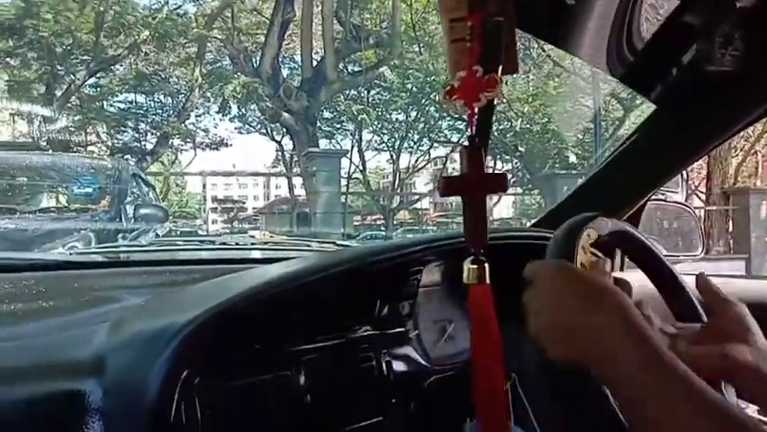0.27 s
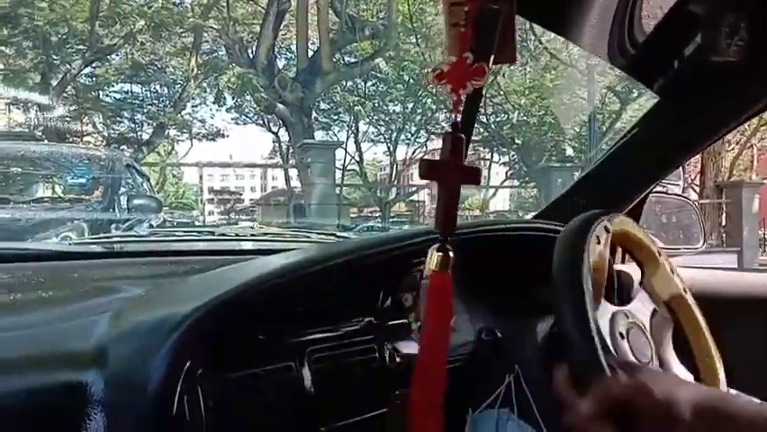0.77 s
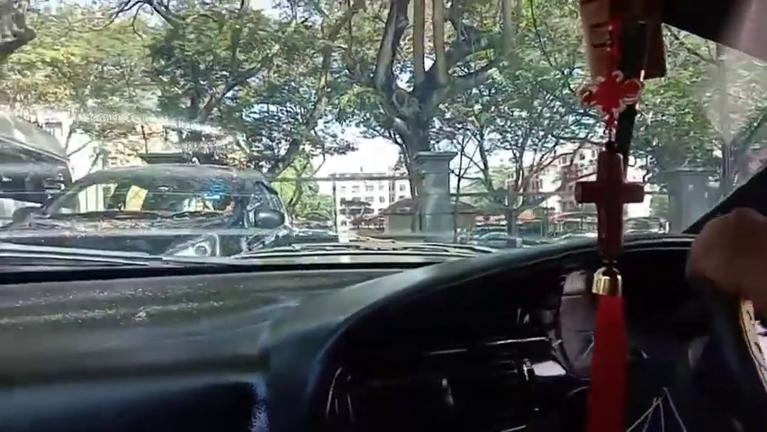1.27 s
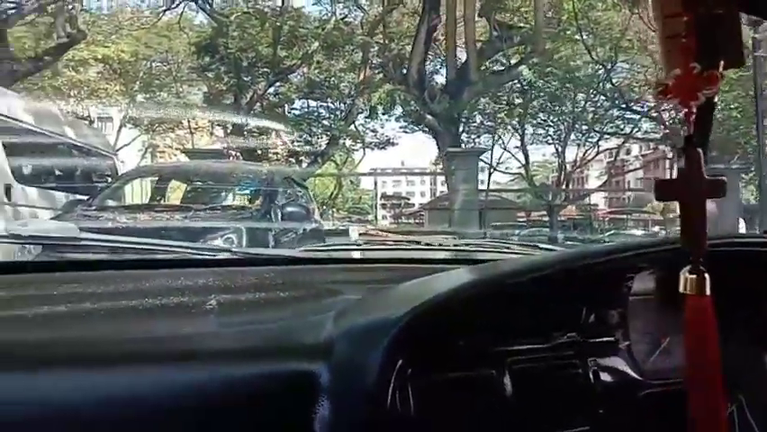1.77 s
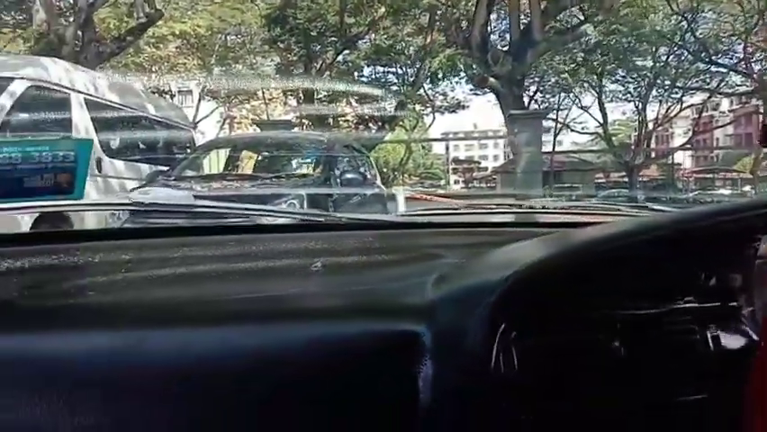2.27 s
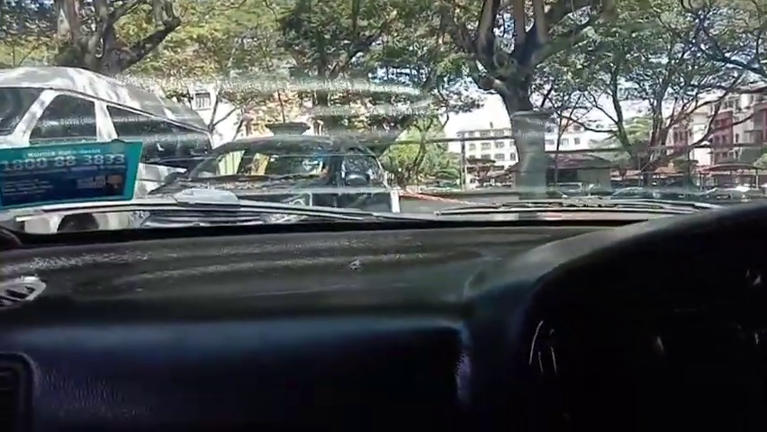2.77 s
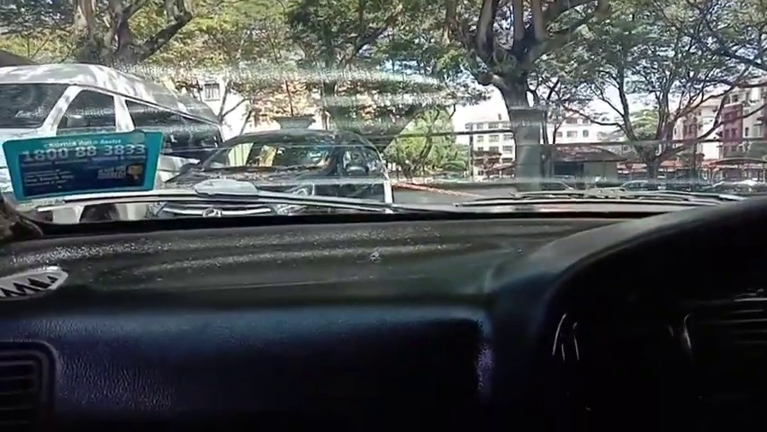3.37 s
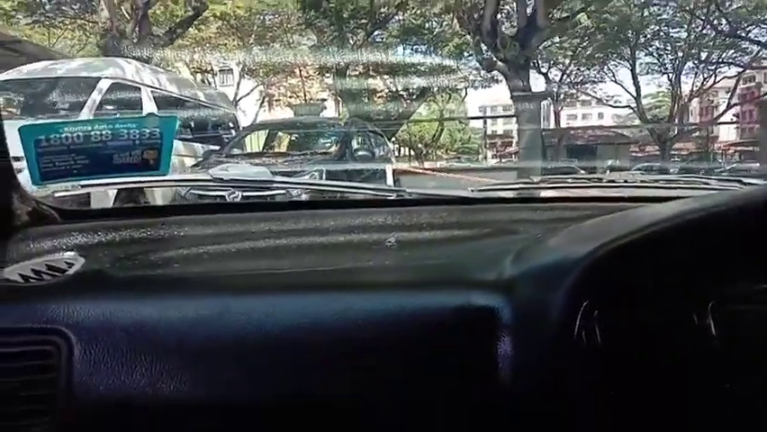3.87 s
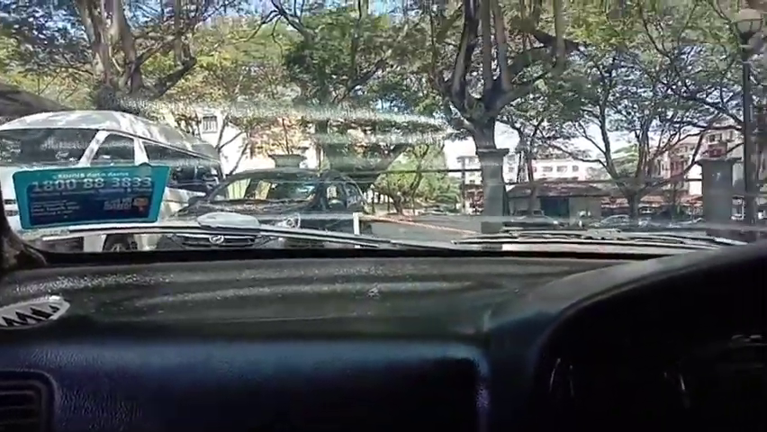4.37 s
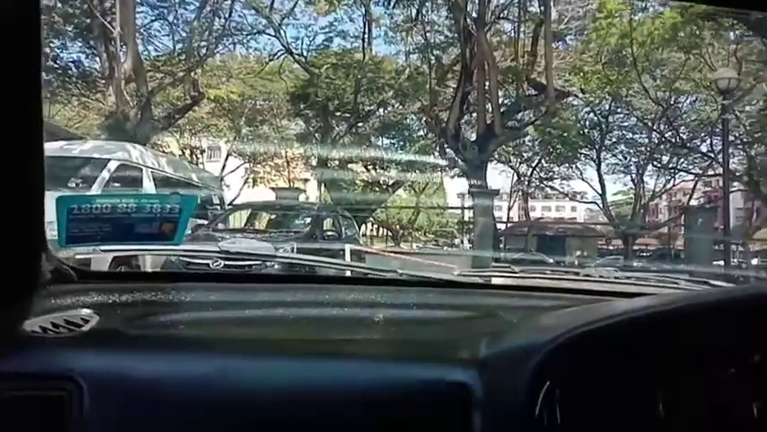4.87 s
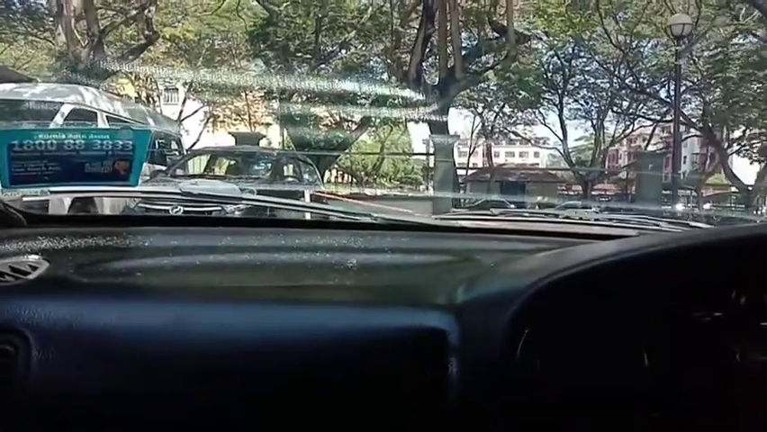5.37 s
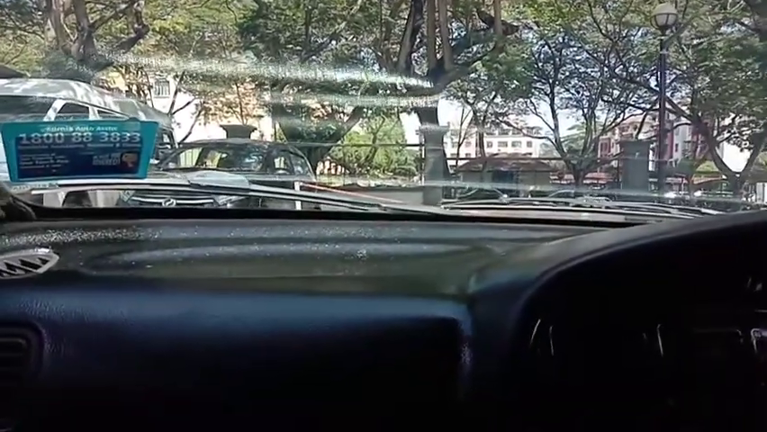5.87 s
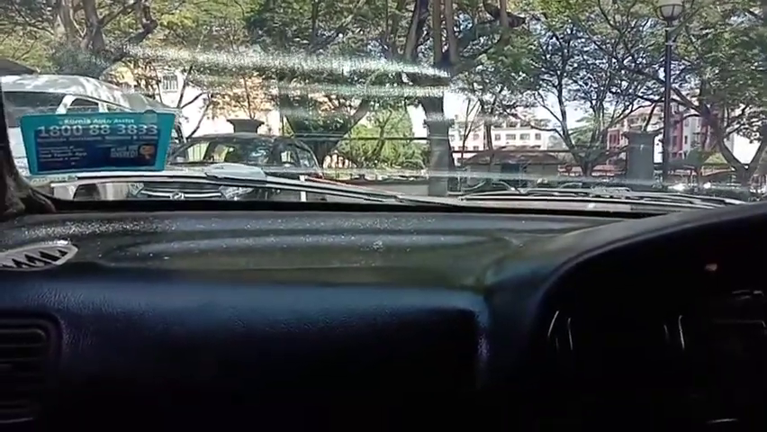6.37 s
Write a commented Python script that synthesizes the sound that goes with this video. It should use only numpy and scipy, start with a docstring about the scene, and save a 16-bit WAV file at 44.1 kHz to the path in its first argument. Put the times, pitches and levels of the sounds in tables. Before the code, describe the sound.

Inside a small car with the windows shut, a microphone by the passenger seat picks up a deep, throbbing engine idle, dull body rumble and soft air hiss. At 0.4 to 0.8 s the steering rim rubs through a palm with faint stuttering squeaks, and an ornament ticks. The engine rises from about 0.7 s, peaks near 1.2 s, then eases until 2.1 s. A second short dab lifts it at 2.2 s, while a loose dashboard panel rattles rapidly until 2.6 s with a low shudder. It sags, then pulls again from 3.2 to 4 s; the panel chatters at 3.9 to 4.1 s and trim creaks. A shudder follows near 4.3 s and 4.5 s as clothing brushes the seat. The engine slowly settles to a low idle until 6.6 s, with light rustles, creaks, hollow pedal bumps near 5.7 and 6.2 s, and very faint bird whistles.

```python
"""A four-cylinder car creeps into a parking space, heard from the passenger seat with the windows shut.
Its engine is a stack of harmonics that follows a speed curve: three dabs of throttle, then idling.
Filtered noise makes the body's rumble and the steady air noise; a loose dashboard panel rings at each slap.
The steering wheel squeaks through a hand by stick and slip, an ornament clicks, and trim creaks.
Clothes brush the seat, feet bump the pedals, and gliding tones make faint birds outside."""
import sys
import numpy as np
from scipy import signal
from scipy.fft import rfft, irfft
from scipy.io import wavfile

SR = 44100
rng = np.random.default_rng(int(sys.argv[2]) if len(sys.argv) > 2 else 0)


def log_audio(samples):
    """Write samples as a 16-bit WAV file to the path given in sys.argv[1]."""
    # one column per channel
    frames = np.atleast_2d(samples).T
    # limit to full scale, then quantise
    limited = np.clip(frames, -1, 1)
    pcm = np.round(limited * 32767).astype(np.int16)
    wavfile.write(sys.argv[1], SR, pcm)


N = 292383
T = np.arange(N) / SR  # time of each sample, s


def undb(db):
    """Decibels to gain."""
    return 10 ** (np.asarray(db) / 20)


def unit(x):
    """Scale to an average strength (rms) of 1."""
    return x / np.sqrt(np.mean(x ** 2))


def curve(rows):
    """Join a table of (time [s], value) by straight lines."""
    return np.interp(T, *np.transpose(rows))


def walk(rate):
    """Smooth chance of spread 1 that changes about `rate` times a second."""
    f = np.arange(N // 2 + 1) * SR / N
    return unit(irfft(rfft(rng.standard_normal(N)) * np.exp(-(f / rate) ** 2), N))


def colour(x, points):
    """Filter by an outline of (frequency [Hz], level [dB]) that falls away steeply beyond its ends."""
    f = np.maximum(np.arange(N // 2 + 1) * SR / N, 1)
    hz, db = np.transpose(points)
    low_end = 1 / (1 + (hz[0] / f / 1.3) ** 6)
    high_end = 1 / (1 + (f / hz[-1] / 1.3) ** 6)
    outline = undb(np.interp(np.log(f), np.log(hz), db))
    return irfft(rfft(x) * outline * (low_end * high_end), N)


def ring(x, modes, order=1):
    """Add up resonances (Hz, width Hz, dB); at order 2 each acts twice, which darkens the valleys."""
    out = 0
    for hz, width, db in modes:
        peak = np.concatenate(signal.iirpeak(min(hz, .45 * SR), hz / width, fs=SR))
        out = out + undb(db) * signal.sosfilt([peak] * order, x)
    return out


def strike(start, t60, attack):
    """Envelope of a blow: quick rise, then a fall by 60 dB in t60 seconds."""
    age = np.maximum(T - start, 0)
    return (1 - np.exp(-age / attack)) * np.exp(-np.log(1000) * np.minimum(age / t60, 4))


def swell(start, end, attack, release):
    """Envelope from 0 to 1: rises from the start, holds, and falls after the end."""
    return np.clip(np.minimum((T - start) / attack, 1 - (T - end) / release), 0, 1)


def birds():
    """Thin gliding whistles, broken up by their many paths through the trees."""
    # bird notes: (start [s], length [s], start pitch [Hz], end pitch [Hz], relative level [dB])
    notes = [(0.224, 0.19, 3010, 3140, -53.5), (4.69, 0.1, 2850, 3126, -52), (5.162, 0.1, 2160, 2240, -50),
             (5.544, 0.11, 2688, 2510, -50), (6.029, 0.076, 3340, 2780, -59),
             (6.105, 0.072, 2580, 2560, -50), (6.425, 0.047, 3234, 3325, -55)]
    out = 0
    for start, length, from_hz, to_hz, db in notes:
        part = np.clip((T - start) / length, 0, 1)
        hz = from_hz + (to_hz - from_hz) * part
        out = out + undb(db) * np.sin(np.pi * part) * np.exp(2j * np.pi * np.cumsum(hz) / SR)
    paths = 1 + walk(70) + 1j * walk(70)
    return np.real(out * paths) / 2


def air(phase, revs):
    """Air hiss with a faint pulse and a narrow wavering band; both are softer while the engine revs high."""
    # colour of the air noise: (frequency [Hz], level [dB])
    hiss_colour = [(500, 11), (660, 1.5), (1030, -4.5), (1270, 7.5), (1530, -1.5), (2700, -8.5),
                   (3800, -14), (5300, -15), (10000, -21.5), (13000, -26.5), (15500, -20.5)]
    middle_db, treble_db, band_db = -56, -57, -59
    softer_db = -2.5 * revs
    # the hiss pulses once per firing
    noise = unit(colour(rng.standard_normal(N) * (1 + 0.13 * np.cos(phase)), hiss_colour))
    soft = signal.sosfiltfilt(signal.butter(2, 3500, fs=SR, output="sos"), noise)
    # a narrow, slowly wavering band of noise: 1240 Hz, 170 Hz wide
    band = unit(ring(rng.standard_normal(N), [(1240, 170, 0)], order=2) * undb(2 * walk(3.3)))
    # the middle wavers more than the treble
    middle = (soft * undb(middle_db) + band * undb(band_db)) * undb(softer_db + 2.2 * walk(20))
    treble = (noise - soft) * undb(treble_db + .5 * softer_db + walk(25))
    return middle + treble


def rustle():
    """Fibres hiss and folds crackle in clumps as cloth brushes the seat, each stroke with its own band."""
    # strokes: (peak [s], rise [s], fall [s], level [dB], centre of the scrape [Hz])
    strokes = [(0.595, 0.03, 0.02, -50.5, 10900), (4.41, 0.17, 0.13, -44, 2820),
               (4.5, 0.2, 0.33, -48.5, 5700), (4.641, 0.041, 0.03, -44.5, 9920),
               (5.16, 0.042, 0.049, -50, 10000), (5.284, 0.032, 0.053, -45, 3780),
               (5.33, 0.039, 0.22, -51.5, 10000), (5.72, 0.12, 0.3, -58.5, 3220)]
    # colour of the cloth: (frequency [Hz], level [dB])
    cloth = [(450, 5), (950, -9.5), (1250, 8), (1600, -13.5), (2400, -5), (4300, -7), (5200, -5),
             (6400, -11), (10500, -8.5), (13000, -23), (15500, -17)]
    # about 1200 tiny snaps a second, in clumps
    snaps = unit(rng.standard_normal(N) * (rng.random(N) < 1200 / SR) * undb(4 * walk(40)))
    hiss = rng.standard_normal(N) * undb(2.5 * walk(400) + 2.2 * walk(45))
    fibres = unit(colour(hiss + .5 * snaps, cloth))
    # folds buckle around 1770 Hz, 4000 Hz wide
    folds = undb(-8.5) * unit(ring(snaps, [(1770, 4000, 0)], order=2))
    out = 0
    for peak, rise, fall, db, hz in strokes:
        scrape = ring(fibres, [(hz, 0.98 * hz, -2)], order=2) * undb(2 * walk(35))
        out = out + undb(db) * unit(fibres + folds + scrape) * swell(peak - rise, peak, rise, fall)
    return out


def clicks():
    """Ornament and keys touch: a tick and a faint longer gritty ring around each one's own pitch."""
    # clicks: (time [s], relative level [dB], rough centre [Hz])
    touches = [(0.488, -34.5, 7000), (2.756, -40.5, 8300), (2.776, -46, 4898), (2.853, -36, 5055),
               (2.861, -35, 6300), (3.886, -41.5, 7303), (4.144, -41, 7773), (4.27, -46, 4900),
               (5.138, -36, 3970)]
    out = 0
    for start, db, hz in touches:
        grit = unit(ring(rng.standard_normal(N), [(hz, 1.14 * hz, 0)], order=2))
        tick = strike(start, t60=0.029, attack=0.0031)
        tail = undb(-25.0) * strike(start, t60=0.36, attack=0.0028)
        out = out + undb(db) * grit * (tick + tail)
    return out * undb(3.5 * walk(300))


def creaks():
    """Plastic trim panels slip in short spurts of noise, each around its own pitch."""
    # creaks: (time [s], relative level [dB], pitch [Hz])
    spurts = [(0.607, -38.5, 1280), (2.758, -39, 1250), (2.857, -38, 1300), (3.884, -41, 1830),
              (4.146, -31, 1400), (4.477, -42, 2580), (4.532, -40, 2306), (4.674, -41.5, 1920),
              (4.746, -37, 2410), (4.85, -43, 2270), (5.087, -44, 1307), (5.322, -39, 1450),
              (5.657, -47, 1960), (5.711, -44, 3060), (6.22, -45, 2500)]
    # colour of the trim: (frequency [Hz], level [dB])
    trim = [(800, -12), (1300, 17.5), (1700, 7), (2600, 10), (3600, -10), (12000, -18)]
    skin = unit(colour(rng.standard_normal(N), trim))
    out = 0
    for start, db, hz in spurts:
        pitched = undb(-7) * unit(ring(skin, [(hz, 900, 0)], order=2))
        out = out + undb(db) * unit(skin + pitched) * strike(start, t60=0.086, attack=0.00245)
    return out * undb(2.5 * walk(300))


def bumps():
    """A shoe lands and scuffs on the pedals; three resonances of the footwell make it hollow."""
    # soft bumps: (time [s], relative level [dB])
    steps = [(0.09, -50), (3.123, -51), (4.5, -44.5), (5.656, -40.5), (6.222, -46), (6.358, -50)]
    scuff = rng.standard_normal(N) * undb(2.7 * walk(50))
    hollow = unit(ring(scuff, [(520, 160, 5), (752, 230, 1.5), (1210, 500, -1)], order=2))
    return hollow * sum(undb(db) * strike(start, t60=0.43, attack=0.0011) for start, db in steps)


def reflections(x, t60, wet_db):
    """Windscreen and side glass return a dense, short echo that leaves a fine fixed ripple on the sound."""
    tail = rng.standard_normal(N) * strike(0, t60, attack=0.00027)
    wet = signal.fftconvolve(x, tail / np.linalg.norm(tail))[:N]
    return (x + undb(wet_db) * wet) / np.sqrt(1 + undb(2 * wet_db))


def wheel(slip_hz):
    """The rim sticks and slips through the palm at an uneven rate, ringing the wheel; each slide squeaks."""
    # slides through the palm: (start [s], end [s], relative level [dB], squeak [Hz])
    slides = [(0.369, 0.459, -46, 6610), (0.501, 0.595, -48.5, 2690), (0.62, 0.78, -59.5, 5380)]
    # the steering wheel's resonances: (frequency [Hz], level [dB])
    wheel_modes = [(1180, 1), (1290, 0.5), (1410, -2), (1800, -7.5), (2030, -2.5), (2345, -0.5), (2520, 3),
                   (2810, -12), (4610, -5.5), (4885, -5), (5240, -9)]
    turn = slip_hz * T + 0.32 * walk(37)
    # each slip starts suddenly and dies down until the next
    slips = rng.standard_normal(N) * undb(2 * walk(45)) * np.exp(-(turn % 1))
    modes = [(hz, 70, db) for hz, db in wheel_modes]  # 70 Hz wide
    # the shifting grip frees now one mode, now another
    rim = unit(sum(ring(slips, [mode], order=2) * undb(2 * walk(6.4)) for mode in modes))
    rim = unit(rim + .5 * unit(ring(slips, modes)))
    out = 0
    for start, end, db, hz in slides:
        squeak = undb(-10) * unit(ring(slips, [(hz, 160, 0)], order=2))
        out = out + undb(db) * (rim + squeak) * swell(start, end, attack=0.017, release=0.072)
    return out


def dashboard():
    """A loose panel slaps its frame; each slap rings its modes with slightly different pitch and balance."""
    # slaps: (time [s], relative level [dB])
    taps = [(2.222, -40.5), (2.254, -37.5), (2.33, -33.5), (2.353, -34), (2.373, -37), (2.388, -39),
            (2.414, -30.5), (2.438, -30.5), (2.464, -38.5), (2.484, -33), (2.504, -36), (2.533, -32),
            (2.598, -37), (3.925, -41.5), (3.948, -31), (3.966, -41), (4.004, -31), (4.036, -36),
            (4.059, -32.5), (4.084, -35), (4.12, -29)]
    # the panel's resonances: (frequency [Hz], width [Hz], level [dB])
    panel = [(488, 130, 6.5), (776, 97, 1), (1290, 160, 7.5), (1770, 61, -1.5), (2320, 120, -0.5),
             (2610, 120, -7.5), (2890, 120, -2.5), (3158.6, 220, -14.5), (5222, 1000, -24)]
    detune, scatter_db = 0.011, 2.5  # spread of pitch (share) and of balance from slap to slap
    grit, out = rng.standard_normal(N), np.zeros(N)
    for start, db in taps:
        span = slice(int((start - .5) * SR), int((start + .5) * SR))
        # soft chatter around the slap
        buzz = undb(-20) * np.exp(-((T - start) / 0.033) ** 2)
        contact = (grit * (strike(start, t60=0.05, attack=0.0014) + buzz))[span]
        modes = []
        for hz, width, mode_db in panel:
            bend, gain = rng.standard_normal(2)
            modes.append((hz * (1 + detune * bend), width, mode_db + scatter_db * gain))
        body = ring(contact, modes, order=2) * undb(7.5)
        tick = ring(contact, [(7630, 5900, -24.0)], order=2)
        out[span] += undb(db) * (body + tick)
    return out


def rumble(phase, pull, boom_db, drone_db):
    """Body and tyres rumble and throb with the firings; pulling holds back how far they rise with the drone."""
    # colour of the dull rumble: (frequency [Hz], level [dB])
    rumble_colour = [(22, -24.5), (50, -7), (66, 7.5), (115, -1), (128, 1.5), (185, 1), (240, -3),
                     (268, -12), (298, -6.5), (350, -20.5), (480, -32), (900, -60.5)]
    throb = 1 + 0.17 * np.cos(phase)
    noise = unit(colour(rng.standard_normal(N) * throb, rumble_colour))
    return noise * undb(-1.38 + 0.69 * drone_db + 0.15 * boom_db - 6 * pull)


def firing_rate():
    """Firings per second: the engine's speed curve, with a little hunting up and down."""
    # engine speed: (time [s], firing rate [Hz])
    speed = [(0, 37.2), (0.5, 38.03), (0.64, 33.52), (0.8, 43.4), (0.97, 41.26), (1.11, 49.13),
             (1.21, 50.7), (1.33, 47.38), (1.58, 38.97), (2.13, 36.76), (2.27, 48.3), (2.5, 47.2),
             (2.71, 39.45), (2.94, 38.23), (3.15, 32.26), (3.32, 47.17), (3.46, 46.26), (3.63, 51.4),
             (3.77, 45.9), (3.85, 48.5), (4.03, 47.58), (4.2, 40.71), (5.05, 36.61), (6.63, 34.36)]
    return curve(speed) * (1 + 0.0063 * walk(12.1))


def drone_level(revs, load, bite, boom_db):
    """The drone grows with revs, throttle and clutch; each shudder of the body adds to it."""
    # the body shudders as the car rolls and brakes: (start [s], end [s], level [dB])
    shudders = [(0.01, 0.105, -34.5), (0.374, 0.556, -31), (0.716, 0.909, -30.5), (1.515, 1.658, -24.5),
                (1.794, 1.861, -25.5), (2.486, 2.619, -21.5), (4.205, 4.457, -26.5), (4.52, 4.58, -22)]
    effort_db = 6 * revs + 10.5 * load + 2.5 * bite
    # the drone follows a small share of the boom's swings
    running_db = -36 + effort_db + 0.092 * (boom_db - np.mean(boom_db))
    shudder = 0
    for start, end, db in shudders:
        shudder = shudder + undb(db) * swell(start, end, attack=0.027, release=0.068)
    return 20 * np.log10(np.hypot(undb(running_db), shudder))


def orders(multiples, hz, phase, flutter_db):
    """Engine harmonics that swell as they cross cabin resonances and flutter with uneven firing."""
    # cabin resonances: (frequency [Hz], width [Hz], level [dB])
    cabin = [(65.3, 19, -2.5), (108.04, 14.4, -4), (159.4, 8, 1.5), (195.2, 34, 5.5), (221, 20, -4.5),
             (293.6, 32, -12), (334.7, 11, -18.5)]
    out, power = 0, 0
    for k in multiples:
        gain_squared = 0
        for f, width, db in cabin:
            gain_squared = gain_squared + undb(2 * db) / (1 + (2 * (k * hz - f) / width) ** 2) ** 2
        tone = np.sin(k * phase + 2 * np.pi * rng.random())
        out = out + np.sqrt(gain_squared) * undb(flutter_db * walk(8.9)) * tone
        power = power + gain_squared
    return out * np.sqrt(2 / power)  # joint rms 1, apart from the flutter


def engine(hz, phase, revs, pull, boom_db, drone_db):
    """The lowest harmonics boom all the time; when the engine pulls, the higher ones sing out."""
    firing = undb(boom_db - 22) * np.sin(phase)
    # at full revs the boom's level follows the drone instead
    low_db = boom_db - 1.5 + revs * (drone_db - boom_db - 5.5)
    boom = undb(low_db) * orders([2, 3], hz, phase, flutter_db=2.0)
    drone = undb(drone_db - 7.0 + 4.13 * pull) * orders(np.arange(4, 9), hz, phase, flutter_db=3.5)
    return firing + boom + drone


def scene():
    """Engine speed, throttle and clutch shape engine and rumble; small cabin noises echo off the glass."""
    # presses of the throttle: (down [s], up [s])
    throttle = [(0.655, 1.379), (2.11, 2.297), (3.1, 3.999)]
    # moments when the clutch bites as the car moves off: time [s]
    bites = [0.55, 2.133, 2.425]
    # low boom before the clutch adds to it: (time [s], level [dB])
    boom_curve = [(0.0, -35), (0.31, -39.5), (0.41, -20.5), (0.53, -35), (0.63, -18), (1.48, -30),
                  (2.42, -21), (2.84, -33), (2.99, -20), (4.08, -25.5), (4.21, -37.5), (4.25, -29),
                  (4.78, -32.5), (4.82, -21), (5.11, -26.5), (6.63, -25.5)]
    bite = sum(np.exp(-((T - at) / 0.075) ** 2) for at in bites)
    hz = firing_rate()
    phase = 2 * np.pi * np.cumsum(hz) / SR
    revs = np.clip((hz - 38) / 9, 0, 1)  # 0 at idle, 1 at the top of a throttle dab
    boom_db = curve(boom_curve) + 1.5 * bite
    presses = [swell(down, up, attack=0.041, release=0.28) for down, up in throttle]
    load = np.max(presses, axis=0)
    pull = np.maximum(revs, load)
    drone_db = drone_level(revs, load, bite, boom_db)

    small = air(phase, revs) + rustle() + clicks() + creaks() + bumps()
    small = reflections(small, t60=0.06, wet_db=-6.0)
    car = rumble(phase, pull, boom_db, drone_db) + engine(hz, phase, revs, pull, boom_db, drone_db)
    return (birds() + small + wheel(slip_hz=56.0) + dashboard() + car)[None]


def record(dry):
    """A steep filter cuts the treble above 15600 Hz."""
    return signal.sosfilt(signal.ellip(8, .2, 70, 15600, fs=SR, output="sos"), dry)


dry = scene()
out = record(dry)
log_audio(out)
```